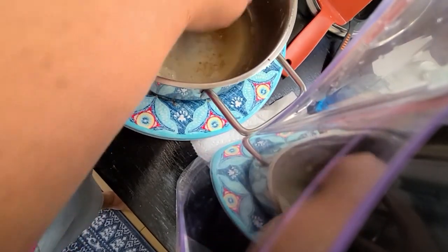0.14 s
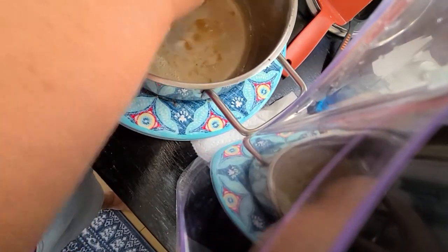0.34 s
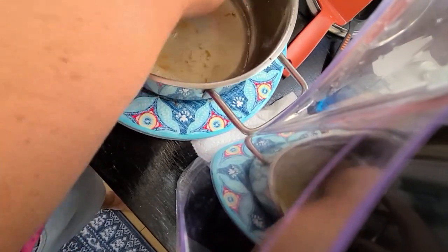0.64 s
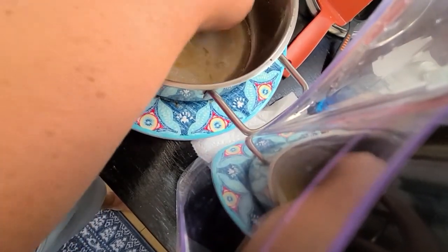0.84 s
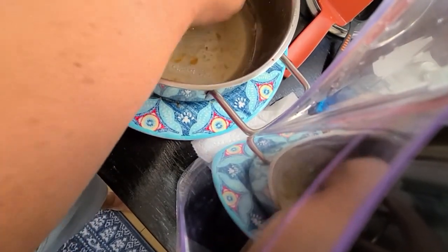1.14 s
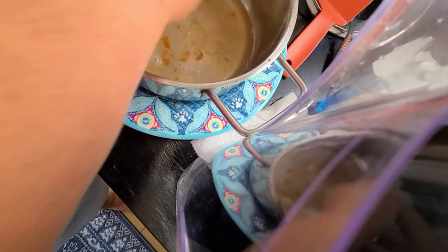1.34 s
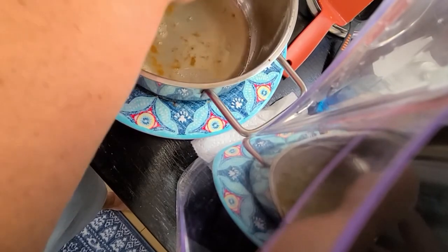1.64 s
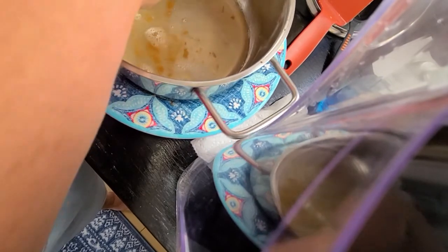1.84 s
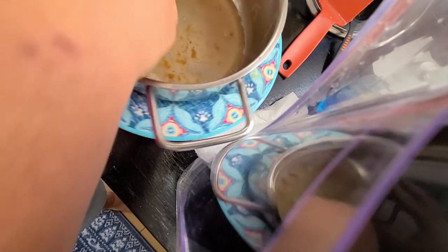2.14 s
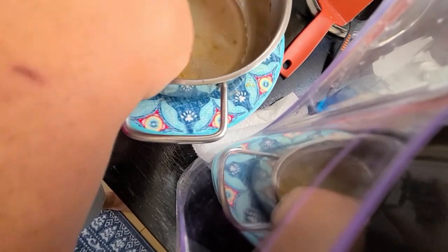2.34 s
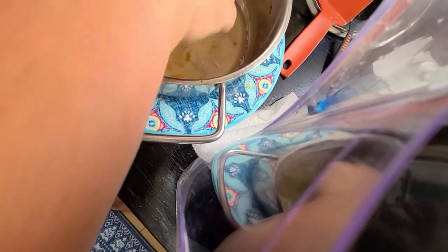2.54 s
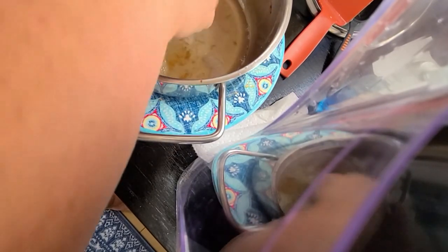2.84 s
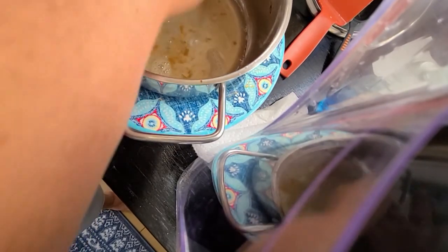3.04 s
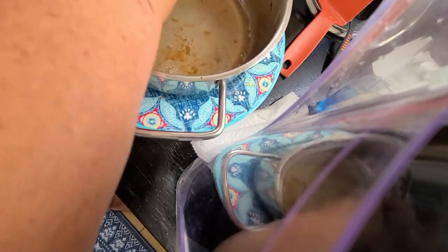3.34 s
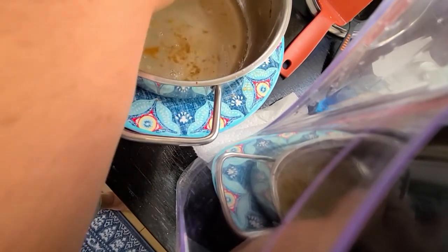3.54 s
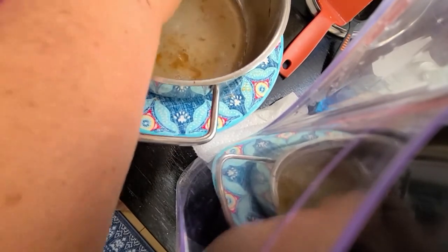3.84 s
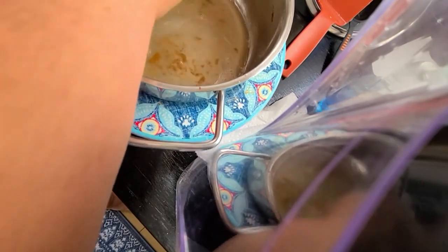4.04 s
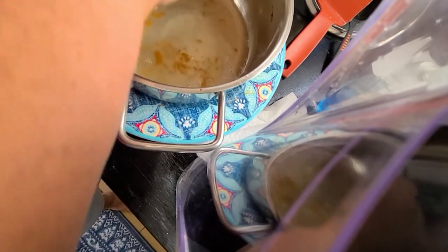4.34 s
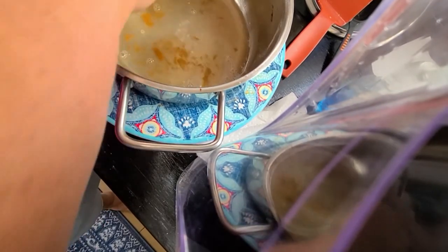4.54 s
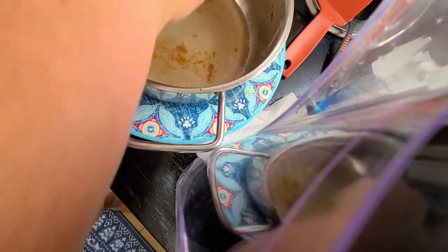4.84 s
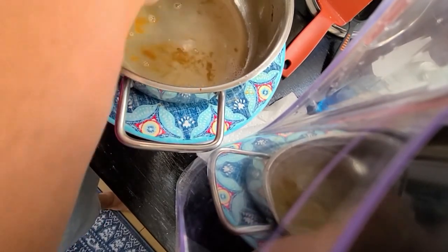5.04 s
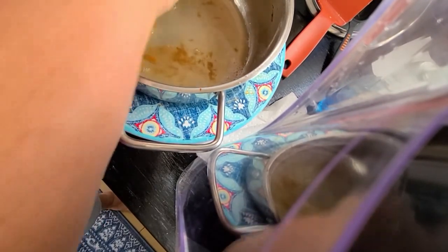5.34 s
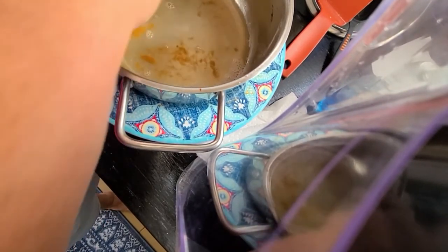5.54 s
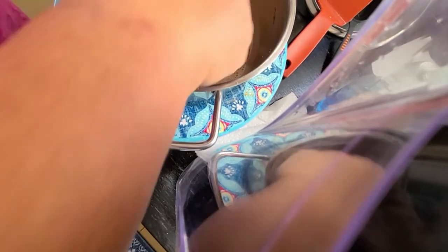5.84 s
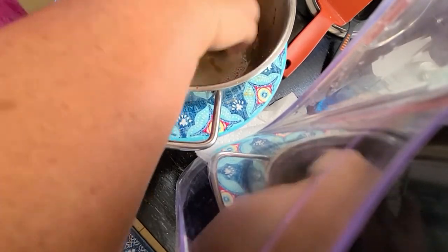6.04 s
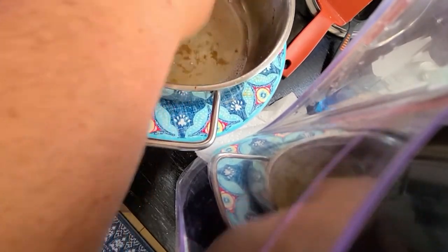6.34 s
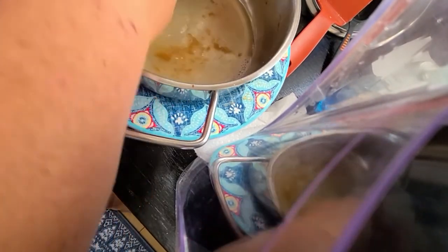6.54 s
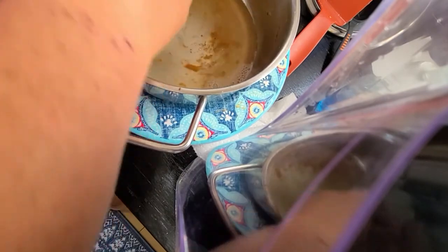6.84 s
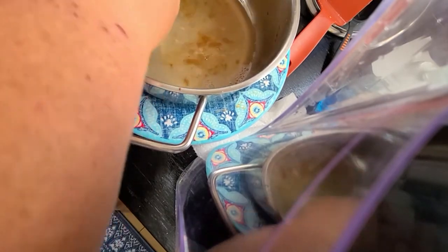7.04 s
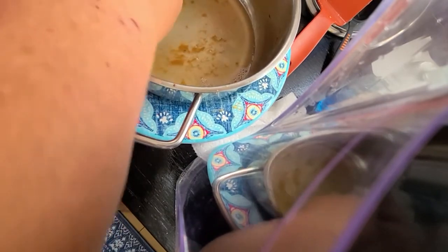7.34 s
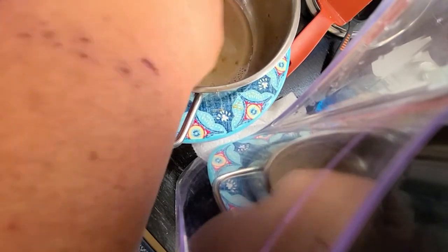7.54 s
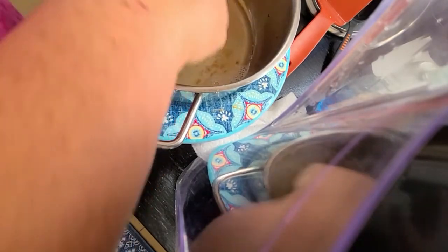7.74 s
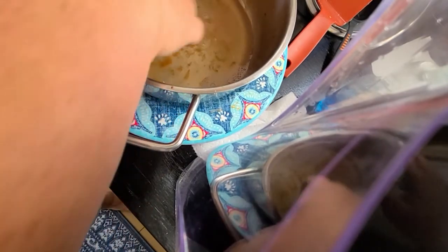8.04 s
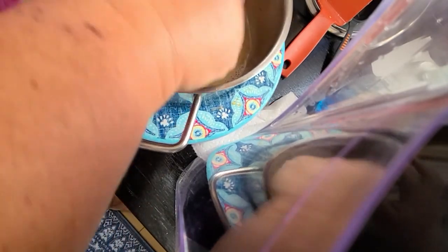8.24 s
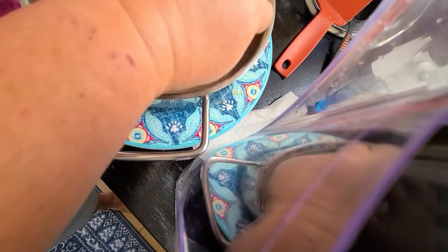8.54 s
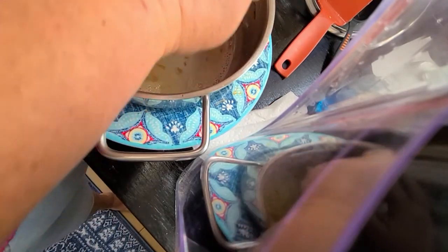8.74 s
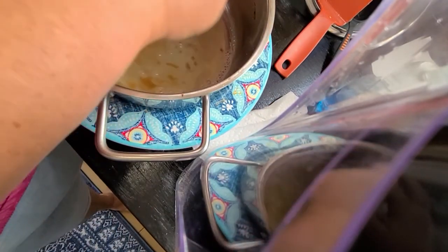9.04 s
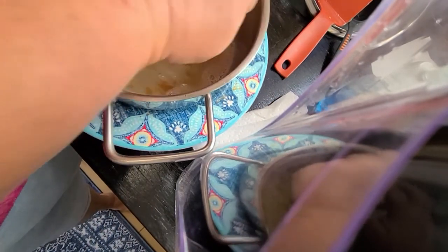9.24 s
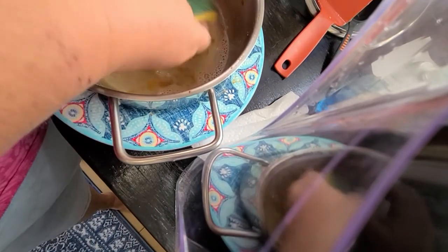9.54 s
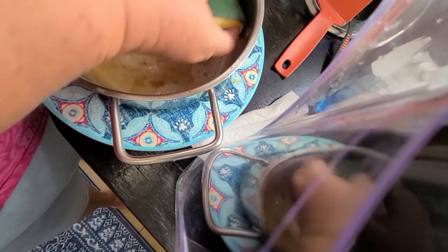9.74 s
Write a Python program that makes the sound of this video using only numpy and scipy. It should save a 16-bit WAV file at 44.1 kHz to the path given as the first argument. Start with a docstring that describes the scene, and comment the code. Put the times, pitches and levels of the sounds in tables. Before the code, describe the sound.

A sponge scrubs a wet steel saucepan in quick uneven raspy strokes, with several hard pan knocks early on and low grinding shifts.

```python
"""A sponge pad scrubs a steel saucepan holding a little water: random fibre contacts rasp in strokes.
The pan drags on its ceramic trivet (contact noise through resonances) and knocks on it (decaying modes).
Wet squelches and wall clanks are pitched noise puffs, drops and foam pop as ticks, the handle clinks once.
A low appliance drone and faint air lie below; echoes of a kitchen follow.
Two close microphone ports hear it, the top of the treble cut steeply."""
import sys
import numpy as np
from scipy import signal
from scipy.fft import rfft, irfft, next_fast_len
from scipy.io import wavfile
from scipy.ndimage import uniform_filter1d

SR = 44100
rng = np.random.default_rng(int(sys.argv[2]) if len(sys.argv) > 2 else 0)


def unload_audio(sound):
    """Save the sound as a 16-bit wav file, at the path given as the first command line argument."""
    columns = np.transpose(np.atleast_2d(sound))
    # keep every value between -1 and 1, then stretch to whole-number steps
    steps = np.round(np.clip(columns, -1, 1) * 32767)
    wavfile.write(sys.argv[1], SR, steps.astype(np.int16))


N = 436590


def from_db(db):
    """Logarithmic level: decibels to amplitude gain."""
    return 10 ** (np.asarray(db) / 20)


def rms_one(x):
    """Normalisation: scale to an rms of 1."""
    return x / np.sqrt(np.mean(x ** 2) + 1e-20)


def in_time(rows):
    """Linear interpolation: the columns of a (seconds, ..) table at every sample."""
    s, *columns = np.transpose(rows)
    return [np.interp(np.arange(N) / SR, s, column) for column in columns]


def at_hz(points, hz):
    """Logarithmic pitch: a (Hz, value) table read on a log-frequency axis."""
    table_hz, values = np.array(points).T
    return np.interp(np.log(hz), np.log(table_hz), values)


def filtered(x, response):
    """Linear filtering: multiply the spectrum by response(Hz)."""
    size = next_fast_len(N + SR // 4)
    hz = np.maximum(np.arange(size // 2 + 1) * SR / size, 1)
    return irfft(rfft(x, size) * response(hz), size)[..., :N]


def coloured(x, spectrum):
    """Spectral shaping: filter by a (Hz, dB) curve."""
    return filtered(x, lambda hz: from_db(at_hz(spectrum, hz)))


def bandpass(x, order, low_hz, high_hz):
    """Band limiting: a Butterworth band-pass."""
    return signal.sosfilt(signal.butter(order, [low_hz, high_hz], "band", fs=SR, output="sos"), x)


def band(x, low_hz, high_hz):
    """Band limiting: a steep band-pass, scaled to rms 1."""
    return rms_one(bandpass(x, 4, low_hz, high_hz))


def drift(rate_hz):
    """Slow random modulation: low-passed noise of spread 1, drawn every 40 samples."""
    r = np.exp(-80 * np.pi * rate_hz / SR)
    noise = rng.standard_normal(N // 40 + 2002)
    slow = signal.lfilter([1], [1, -2 * r, r * r], noise)[2000:]   # skip the settling of the filter
    return np.interp(np.arange(N) / 40, np.arange(len(slow)), rms_one(slow))


def grains(per_s, spread_db):
    """Shot noise: random contacts of uneven size."""
    excess_db = spread_db * np.minimum(rng.exponential(1, N), 4)
    sizes = from_db(excess_db) * rng.standard_normal(N)
    return sizes * (rng.random(N) < per_s / SR)


def clicks(times, gains):
    """Impulse excitation: one click at each time."""
    out = np.full(N, 1e-18)   # a trace above zero keeps the resonators quick
    out[np.round(np.asarray(times) * SR).astype(int)] = gains
    return out


def ring(x, hz, t60):
    """Damped free vibration: each click starts a sine that falls by 60 dB in t60 seconds."""
    r, w = from_db(-60 / (t60 * SR)), 2 * np.pi * hz / SR
    return signal.lfilter([0, np.sin(w)], [1, -2 * r * np.cos(w), r * r], x)


# Spectrum shape of the appliance drone. Each row: frequency [Hz], level [dB per Hz, relative].
DRONE_SPECTRUM = [(13, -32.5), (22, -15), (53, 3), (81, 6.5), (105, -4), (168, -18.5), (200, -22.5),
                  (260, -43), (440, -120)]
# Spectrum shape of the room air. Each row: frequency [Hz], level [dB per Hz, relative].
AIR_SPECTRUM = [(88, -31), (150, -7), (482, -13), (725, -5.5), (899, -17), (1330, -9), (2160, -19),
                (6540, -26.5), (15700, -31.5)]
DRONE_DB, AIR_DB = -52, -74.5
DRONE_LEFT_DB = -1.8   # left over right


def background():
    """Partial coherence: a wavering low drone nearly alike at both ports, and independent faint air."""
    common, difference = coloured(rng.standard_normal((2, N)), DRONE_SPECTRUM)
    drone = common + 0.157 * difference * [[1], [-1]]
    drone = drone * from_db([[DRONE_LEFT_DB / 2], [-DRONE_LEFT_DB / 2]])
    air = coloured(rng.standard_normal((2, N)), AIR_SPECTRUM)
    waver_db = 0.5 * drift(4.5)
    return from_db(DRONE_DB + waver_db) * rms_one(drone) + from_db(AIR_DB) * rms_one(air)


KITCHEN_T60_S = 0.16
ECHO_LOW_HZ, ECHO_HIGH_HZ = 150, SR / 2.5   # band that the walls return


def kitchen(x):
    """Diffuse reverberation: dense band-limited echoes decay exponentially, different at each port."""
    t = np.arange(SR // 2) / SR
    echoes = rng.standard_normal((2, len(t))) * from_db(-60 * t / KITCHEN_T60_S)
    echoes = echoes * (t > .002)   # the first reflection comes after 2 ms
    echoes = bandpass(echoes, 1, ECHO_LOW_HZ, ECHO_HIGH_HZ)
    echoes = echoes / np.sqrt(np.sum(echoes[0] ** 2))
    return signal.fftconvolve(x, echoes, axes=1)[:, :N]


# Balance between the ports. Each row: frequency [Hz], left over right [dB].
LEFT_LOUDER_DB = [(100, -1), (500, 3), (1500, 0), (4500, 5), (8000, 1.5), (15000, 3)]
# Phase between the ports. Each row: frequency [Hz], lead of the left port [radians].
LEFT_LEAD_RAD = [(100, .15), (250, .55), (500, 1.15), (1000, 1.3), (2000, 1.6), (15000, 1.6)]


def ports(x):
    """Interaural-like cues: the case around the ports makes the left lead and colours their balance."""
    sides = np.array([[1], [-1]])

    def response(hz):
        gain = from_db(sides * at_hz(LEFT_LOUDER_DB, hz) / 2)
        return gain * np.exp(.5j * sides * at_hz(LEFT_LEAD_RAD, hz))
    return filtered(x, response)


# A touch on the handle. Each row: start [s], nominal level [dB].
HANDLE_TOUCHES = [(5.8983, -37.5)]
# Modes of the handle. Each row: frequency [Hz], relative level [dB], time to fade by 60 dB [s].
HANDLE_MODES = [(3060, 1, 0.31), (3190, 2, 0.6), (4820, -9.5, 0.34), (4920, -3, 0.28), (5557, -1.5, 0.182),
                (6610, -4.5, .08), (7300, 3.5, 0.069)]


def handle():
    """Modal ringing: one light touch excites the bent steel rod."""
    s, level_db = np.transpose(HANDLE_TOUCHES)
    out = np.zeros(N)
    for hz, mode_db, t60 in HANDLE_MODES:
        out += ring(clicks(s, from_db(level_db + mode_db - 17.0)), hz, t60)
    return out


# Short pitched rasps, squelches of the wet sponge and clanks of the pan wall.
# Each row: start [s], nominal level [dB], pitch [Hz], time to fade by 60 dB [ms].
PITCHED_PUFFS = [(0.152, -54, 2690, 50.), (0.232, -46.5, 1330, 54), (0.896, -54, 2700, 60.),
                 (1.779, -46.5, 3240, 58), (2.16, -49, 1620, 65.), (2.226, -46, 1740, 108),
                 (3.108, -45.5, 4420, 30.), (3.866, -26, 2700, 25), (3.867, -32.5, 3080, 28),
                 (6.165, -48.5, 2950, 36), (6.247, -59, 4100, 49), (6.689, -46, 1600, 55),
                 (6.697, -46.5, 2600, 36), (6.902, -46, 3750, 47), (7.219, -45.5, 2476, 26.5),
                 (7.218, -45, 1647, 32), (7.813, -58, 3700, 60.), (8.43, -46.5, 2380, 30.),
                 (8.513, -44, 2550, 93), (8.516, -51, 3730, 95.)]


def squelches_and_clanks():
    """Narrow-band noise: each squelch, rasp or clank is a short puff around a pitch."""
    out, t = np.zeros(N), np.arange(SR // 4) / SR
    for s, level_db, hz, fade_ms in PITCHED_PUFFS:
        puff = bandpass(rng.standard_normal(len(t)), 2, hz / 1.13, hz * 1.1)
        attack = np.minimum(t / 0.00097, 1)
        fade = from_db(-60 * (t / (fade_ms / 1000)) ** 2)
        start = round(s * SR)
        out[start:start + len(t)] += from_db(level_db - 3.5) * attack * fade * rms_one(puff)
    return out


# Drops popping. Each row: start [s], nominal level [dB].
DROP_POPS = [(2.0163, -37), (5.7913, -44), (5.8589, -43.5), (6.1554, -53.5), (6.4018, -66), (7.7792, -52),
             (7.8366, -50), (8.008, -39), (8.1085, -87), (8.6802, -36.5), (9.4568, -46)]
FOAM_POPS_PER_S, FOAM_DB = 9, -59.5


def pops():
    """Heavily damped resonance: drops, and faint foam at random, pop as bare bright ticks."""
    s, level_db = np.transpose(DROP_POPS)
    drops = ring(clicks(s, from_db(level_db)), 7800, 0.00057)
    foam = from_db(FOAM_DB) * grains(FOAM_POPS_PER_S, spread_db=4.5)
    return drops + ring(foam + 1e-18, 11500, .0012)


# Pan knocks on the trivet. Each row: start [s], nominal level [dB], brightness [dB per octave],
# treble crack [dB per octave], worktop thud over the nominal level [dB].
KNOCK_EVENTS = [(0.101, -46, 7, -3, 3), (0.39, -44.5, -5, -2.5, -13.5), (0.458, -49.5, 2.5, -4, 9),
                (0.709, -12, -0.5, 2.5, -14.5), (0.992, -12, -1, 4.5, -19), (1.265, -18, -1.5, 2.5, -13),
                (1.417, -48, -1, 0, -14.5), (2.273, -36, 5.5, -15, -15), (2.303, -36, 2.5, 2, -12),
                (2.677, -57, 0.5, -2.5, -16.5), (3.865, -28.5, -0.5, 3.5, -13.5),
                (4.244, -19.5, -2.5, 0, -19), (5.461, -32, -4.5, -3, -20.5), (5.898, -47.5, -7, -2, -22),
                (9.197, -20.5, -1, -4, -21.5), (9.334, -47, -1, 8, -12)]
# Low modes of the pan on its trivet. Each row: frequency [Hz], relative level [dB],
# time to fade by 60 dB before the damping of the grip [s].
PAN_MODES = [(205.7, -7.5, 0.2), (230, -16, 0.11), (302, -11.5, 0.27), (389.8, 0.5, 0.18), (449, -4, 0.18),
             (579.4, -1, 0.21), (738, -22.5, 0.257), (973.3, -8.5, 0.26), (1153, -5, 0.16),
             (1200.4, 3, 0.073), (1325, -4, 0.07), (1296, -12, 0.068), (1425, -5.5, 0.27),
             (1602, -2.5, 0.094), (1710, -6.5, 0.11), (1914, -10, 0.111), (2120, -14.5, .07),
             (2320, -12, .07)]
# Dense upper modes. Each row: frequency [Hz], relative level [dB per Hz].
CLATTER_SPECTRUM = [(150, -13), (450, -12.5), (800, -20.5), (1200, -10), (2000, -14.5), (3200, -17.5),
                    (5000, -32.5), (6300, -17.5), (9000, -48), (15500, -22.5)]
# Decay of the upper modes. Each row: frequency [Hz], time to fade by 60 dB [s].
CLATTER_FADE_S = [(200, 0.28), (700, 0.15), (1800, 0.082), (5000, 0.031), (12000, 0.0122)]


def knocks():
    """Impact excitation: each knock strikes low modes, a clatter dying band by band, and the worktop."""
    s, level_db, tilt_db, crack_db, thud_db = np.transpose(KNOCK_EVENTS)
    chance_db = 1.5 * rng.standard_normal((len(s), len(PAN_MODES)))
    out = ring(clicks(s + 0.004, from_db(level_db + thud_db)), 68.96, 0.36)   # worktop thud
    for k, (hz, mode_db, t60) in enumerate(PAN_MODES):
        strike_db = level_db + mode_db - 10.5 + tilt_db * np.log2(hz / 600) + chance_db[:, k]
        gripped_t60 = min(t60, 140 / hz)   # the grip damps high modes
        out += ring(clicks(s, from_db(strike_db)), hz, gripped_t60) * (-1) ** k
    # the contact lasts a moment, which softens thud and modes
    out = signal.sosfilt(signal.butter(2, 3000, fs=SR, output="sos"), out)

    edges, white = 150 * 2 ** np.arange(0, 7, .5), rng.standard_normal((2, N))
    rise = np.exp(-1 / (0.000685 * SR))
    for k, (low, high) in enumerate(zip(edges, edges[1:])):
        hz = np.sqrt(low * high)
        strike_db = level_db - 32 + at_hz(CLATTER_SPECTRUM, hz) + 10 * np.log10(hz)
        strike_db += tilt_db * np.log2(hz / 600)
        strike_db += crack_db * max(np.log2(hz / 2500), 0)   # a hard edge changes the treble
        fall = from_db(-60 / (at_hz(CLATTER_FADE_S, hz) * SR))
        decay = signal.lfilter([1], [1, -fall], clicks(s, from_db(strike_db)))
        envelope = signal.lfilter([1 - rise], [1, -rise], decay)
        out += envelope * rms_one(bandpass(white[k % 2], 2, low, high))
    return out


# Part of the rub heard by one port only. Each row: frequency [Hz], share of the power [0 to 1].
OWN_PORT_SHARE = [(300, .15), (2000, .3), (6000, .45), (12000, .55)]


def spread_rub(per_s, spread_db):
    """Extended source: contacts lie all over a wide base, so in the treble each port favours other ones."""
    common, left, right = [grains(per_s, spread_db) for _ in range(3)]
    shared = filtered(common, lambda hz: np.sqrt(1 - at_hz(OWN_PORT_SHARE, hz)))
    own = filtered(np.array([left, right]), lambda hz: np.sqrt(at_hz(OWN_PORT_SHARE, hz)))
    return shared + own


def wandering_modes(x, peaks, wander_db):
    """Position-dependent coupling: resonances change strength as the contact moves over the steel."""
    out = x
    for hz, width_hz, db in peaks:
        r = np.exp(-np.pi * width_hz / SR)
        poles = [1, -2 * r * np.cos(2 * np.pi * hz / SR), r * r]
        mode = signal.lfilter([(1 - r * r) / 2, 0, (r * r - 1) / 2], poles, x)
        out = out + from_db(db + wander_db * drift(6.6)) * mode
    return out


# Pan dragging and rocking on the trivet. Each row: time [s], low grind [dB], edge grind [dB].
DRAG_LEVELS = [(0.0, -73, -75), (1.24, -53.5, -61), (1.49, -68.5, -56.5), (2.15, -53.5, -53),
               (2.42, -62.5, -75), (2.78, -77.5, -74), (3.28, -52.5, -57.5), (3.72, -66.5, -81),
               (3.97, -54, -46.5), (4.77, -74, -78.5), (5.48, -61, -65.5), (7.0, -72, -80.5),
               (7.42, -61.5, -62), (8.22, -61, -78), (8.41, -64.5, -56.5), (8.91, -69.5, -76),
               (9.62, -67.5, -71), (9.9, -59, -53.5)]
# Soft lurches of the pan under the hand. Each row: start [s], added grind peak [dB],
# added edge peak [dB], swell time [s].
LURCH_EVENTS = [(0.223, -79, -53.5, 0.0098), (1.782, -42.5, -43, 0.017), (2.016, -40, -46, 0.0097),
                (2.074, -45, -71, 0.0123), (2.11, -44, -55, 0.0083), (2.273, -43, -43, 0.012),
                (3.284, -51, -68, 0.011), (3.781, -36, -48, 0.0092), (3.874, -34, -37, 0.011),
                (3.904, -30, -46, 0.011), (3.946, -29.5, -50, 0.0087), (4.082, -38, -49, 0.00934),
                (4.5, -66, -58.5, 0.016), (5.4, -53, -83, .01), (5.73, -48, -88, 0.0059),
                (5.919, -50.5, -66, 0.027), (6.612, -51, -63, 0.037), (6.691, -47, -55, 0.015),
                (6.921, -41.5, -54, 0.015), (7.149, -52.5, -77, 0.009), (7.266, -45, -67, 0.022),
                (7.93, -45, -47, 0.025), (8.28, -53.5, -56.5, 0.032), (9.3, -42.5, -59, 0.014),
                (9.86, -52, -49.5, 0.013)]
# Spectrum of the grind before its resonances. Each row: frequency [Hz], level [dB per Hz, relative].
GRIND_SPECTRUM = [(71, -4.5), (120, 7.5), (171, -6.5), (260, -5.5), (439, -10.5), (485, -17.5), (1000, -30),
                  (2070, -33), (2500, -31.5), (3250, -41), (5500, -120)]
# Resonances in the grind. Each row: frequency [Hz], width [Hz], mean level over the grind [dB].
GRIND_MODES = [(210, 27, -1.5), (301, 95, 10), (363, 15.4, -2), (725.3, 12, -3.5), (1033, 93, 4),
               (1310, 63, -1.5), (1704.4, 30.1, -16)]
PAD_DRAGS_DB = -12   # grind that each stroke adds, over the rasp


def dragging(stroke):
    """Frictional excitation: the base rubs over the glaze, drives low modes and swells at each lurch."""
    grind, edge = from_db(in_time(DRAG_LEVELS))
    grind = grind + from_db(PAD_DRAGS_DB) * stroke
    t = np.arange(SR // 4) / SR
    for s, grind_db, edge_db, swell_s in LURCH_EVENTS:
        start = round(s * SR)
        at = slice(start, start + len(t))
        swell = t / swell_s * np.exp(1 - t / swell_s)   # peaks at 1 after swell_s
        swell = swell[:N - start]
        grind[at] += from_db(grind_db) * swell
        edge[at] += from_db(edge_db) * swell ** 2.72
    contacts = coloured(spread_rub(3000, spread_db=2.0), GRIND_SPECTRUM)
    slips = wandering_modes(contacts, GRIND_MODES, wander_db=4.0)
    low = grind * from_db(0.8 * drift(24.07)) * band(slips, 108.6, 665)
    high = edge * from_db(2.5 * drift(18.0)) * band(slips, 592.0, 2080)
    return low + high


# Pad strokes. Each row: start [s], length [s], rasp [dB], swell from start to end [dB],
# then over the rasp: fine hiss [dB], pan wall [dB], pan base [dB].
PAD_STROKES = [(0.127, 0.14, -62.5, -4, -12, 1, 3), (0.203, 0.29, -66.5, -24, -2.5, -8, 0.5),
               (0.445, 0.1, -50, -15, -13, -9.5, -1), (0.571, 0.23, -59.5, -11, -9, -5, 3.5),
               (0.738, 0.14, -57.5, 6, -6, -8, -2), (0.876, 0.095, -45.5, 5, -6.5, -5, 2),
               (1.018, 0.1, -56, -7, -2, -1, -9), (1.128, 0.18, -62, -26, -4, -3.5, 5.5),
               (1.265, 0.17, -72, -19.5, -1, 2, 15), (1.535, 0.59, -62.5, 0, -7.5, -8.5, -16),
               (2.09, 0.0656, -57.5, -2, 3, 4, -8), (2.194, 0.095, -67, 2, -10, 11, -6),
               (2.258, 0.1, -57.5, -18, -6, 10.5, 1), (2.663, .07, -55.5, 2, -13.5, -2, 3),
               (2.744, .1, -63.5, 8, -4, 1, -15), (3.048, 0.17, -63.5, -6, -7, 3.5, 9.5),
               (3.183, .2, -59, -1, -7.5, -5, -2), (3.4, 0.24, -58, -7, -6, -5.5, 1),
               (3.662, 0.18, -55.5, -3.5, -7.5, -5, 7), (3.84, 0.14, -57, 5, -4, 6, 16),
               (3.982, 0.14, -56, 32, -6.5, -4, 0), (4.103, 0.22, -75.5, -9.5, -3, 0, 0),
               (4.374, 0.34, -63, 4, -8.5, -12, -6.5), (4.75, 0.087, -66.5, -3, -4, -3, -10),
               (4.951, 0.23, -58.5, 28, -7.5, -14, -5), (5.211, 0.17, -51.5, 25, -9.5, -12, -4),
               (5.449, .3, -61, -10, -10, -11, -5), (5.889, 0.067, -63, -19, -5, 3, 16),
               (6.082, 0.15, -76, 8, -11, 5, 7), (6.218, 0.11, -67, -3.5, 2, -4, 6),
               (6.44, 0.353, -67, 2, -9.5, -5, 2.5), (6.878, 0.27, -68, -14, -7.5, -6.5, -3.5),
               (7.124, 0.17, -63, 1, -9, -9, -7.5), (7.291, 0.25, -70, -10, -2.5, -10, -4),
               (7.803, 0.11, -64, -2, -20, -3, 7), (7.897, 0.16, -72.5, -9, -9, 5.5, -7),
               (8.108, 0.33, -77.5, 4, -18, 6.5, 8), (8.414, 0.086, -73, 0, -11.5, -4, -1),
               (8.507, 0.077, -63, -11, -11, 3, -7), (8.697, 0.28, -69.5, -13, -8.5, -5, -3),
               (8.975, 0.29, -77.5, -9, -4.5, 2.5, 1), (9.218, 0.14, -72.5, -6, -6, 4, 8),
               (9.354, 0.23, -86, 6.5, -17, 8, -6), (9.632, 0.1, -68, 4, -9, -6, -1),
               (9.689, 0.14, -59.5, -4, -5.5, -2.5, -20), (9.78, 0.23, -62, 5, 0, -7, 3)]
ATTACK_S, RELEASE_S, EDGE_POWER = 0.05, 0.13, 1.53   # the pad speeds up and slows down at each turn
TURN_DB, TURN_S = -15.5, .3   # rub left at the turns, under the mean over a window centred on the moment
RESTING_DB, RESTING_HISS_DB = -80.5, -83   # pad pressed but nearly still


def stroke_levels():
    """Speed-dependent friction: rasp, hiss, wall and base gains follow the pad from turn to turn."""
    out, t = np.zeros((4, N)), np.arange(N) / SR
    for s, length_s, rasp_db, swell_db, hiss_db, wall_db, base_db in PAD_STROKES:
        at = slice(round(s * SR), round((s + length_s) * SR))
        since = t[at] - s
        speed = np.clip(np.minimum(since / ATTACK_S, (length_s - since) / RELEASE_S), 0, 1)
        swell = from_db(rasp_db + swell_db * (since / length_s - .5))
        level = np.sin(np.pi / 2 * speed) ** EDGE_POWER * swell
        out[:, at] += from_db([[0], [hiss_db], [wall_db], [base_db]]) * level
    # in quick scrubbing the pad never quite stops
    out += from_db(TURN_DB) * uniform_filter1d(out, round(TURN_S * SR))
    return out + from_db([[RESTING_DB], [RESTING_HISS_DB], [RESTING_DB], [RESTING_DB]])


# Spectrum of the fibres before the modes. Each row: frequency [Hz], level [dB per Hz, relative].
RASP_SPECTRUM = [(500, -13.5), (1800, -9.5), (3500, -7.5), (5150, -5), (5700, 0), (8000, -2.5),
                 (10500, -11), (12000, -10.5), (15700, -9)]
# Wet wall modes. Each row: frequency [Hz], width [Hz], mean level over the rasp [dB].
WALL_MODES = [(702, 80, 28.5), (1305, 100, 22.5), (1902, 87, 9.5), (2570, 76, 13), (3280, 140, 8.5),
              (3910, 71, 2), (4740, 360, 0.5), (5730, 42, 0.5), (6360, 164, 4.5), (7355, 81, 3.5),
              (8870, 43, 3), (9500, 61, -7), (9550, 64, 2.5), (11500, 170, -11.5)]
# Wall modes while the pan slides. Each row: frequency [Hz], width [Hz], mean level over the rasp [dB].
SLIDE_MODES = [(2414, 103, 11), (3180, 130, 4.5), (3686, 50, 4)]
# The pan creeping over the trivet, heard in its wall. Each row: time [s], level [dB].
SLIDE_LEVELS = [(0.0, -88), (0.91, -68.5), (2.18, -62), (2.34, -81), (2.67, -76), (3.86, -72.5), (4.8, -77),
                (5.46, -71.5), (5.62, -75), (7.03, -79), (7.39, -68.5), (8.19, -79), (8.36, -66),
                (8.8, -83), (9.73, -73.5), (9.9, -58)]


def scrubbing(stroke, fine, on_wall, on_base):
    """Stick-slip shot noise: fibres catch on steel thousands of times a second; the wet wall resonates."""
    fibres = coloured(spread_rub(7000, spread_db=1.5), RASP_SPECTRUM)
    rung = wandering_modes(fibres, WALL_MODES, wander_db=6.5)
    rasp = stroke * from_db(1.7 * drift(25)) * band(rung, 5292, 9660)
    hiss = fine * from_db(3.0 * drift(25)) * band(rung, 10200, 15650)
    sliding = wandering_modes(fibres, SLIDE_MODES, wander_db=3.5)
    slid = from_db(in_time(SLIDE_LEVELS)[0]) * band(sliding, 1600, 4280)
    wall = from_db(1.2 * drift(23)) * (on_wall * band(rung, 2410, 4820) + slid)
    base = on_base * from_db(3.8 * drift(8.4)) * band(rung, 468.1, 1980)
    return rasp + hiss + wall + base


KITCHEN_DB = -11   # gain of the echoes


def scene():
    """Superposition: the pan heard directly and by the walls, over the background."""
    stroke, fine, on_wall, on_base = stroke_levels()
    pan = handle() + squelches_and_clanks() + pops() + knocks() + dragging(stroke)
    pan = pan + scrubbing(stroke, fine, on_wall, on_base)
    return background() + from_db(KITCHEN_DB) * kitchen(pan) + ports(pan)


CUTOFF_HZ = 15830


def record(dry):
    """Band limiting: a steep elliptic low-pass cuts the top."""
    return signal.sosfilt(signal.ellip(10, .5, 60, CUTOFF_HZ, fs=SR, output="sos"), dry)


dry = scene()
out = record(dry)
unload_audio(out)
```